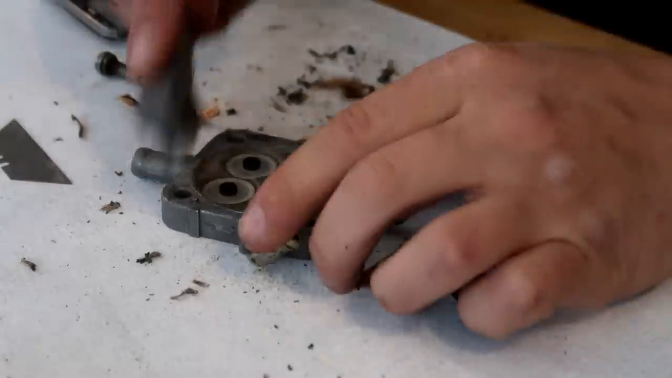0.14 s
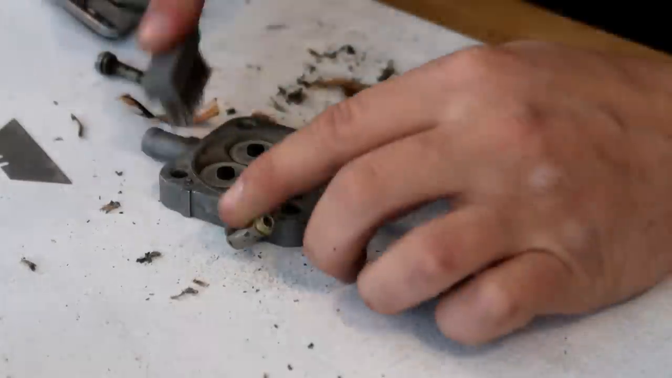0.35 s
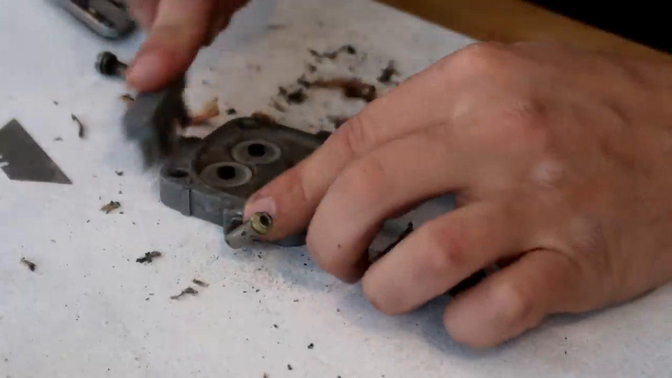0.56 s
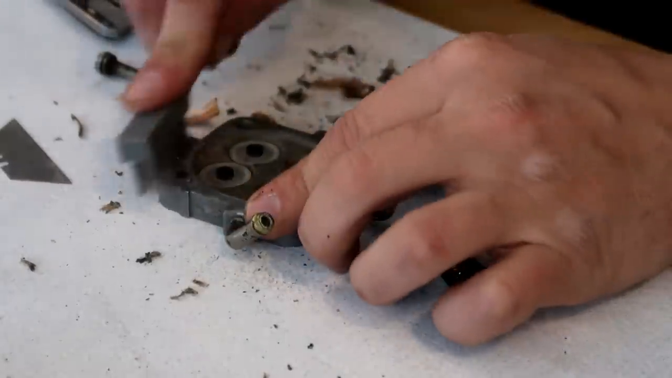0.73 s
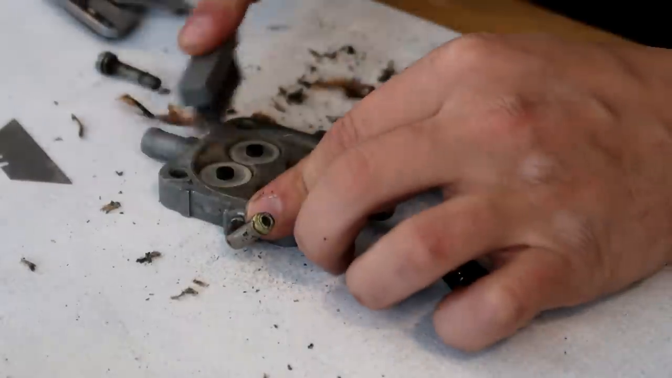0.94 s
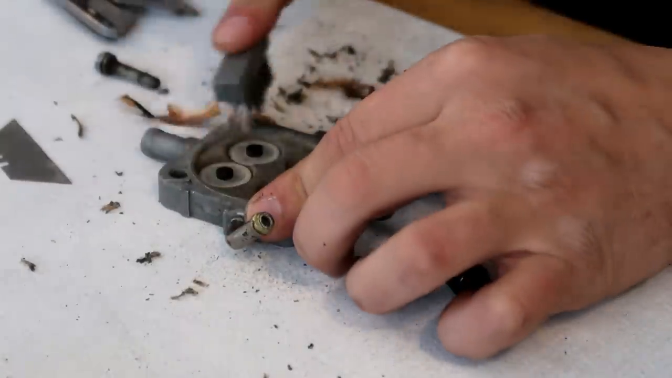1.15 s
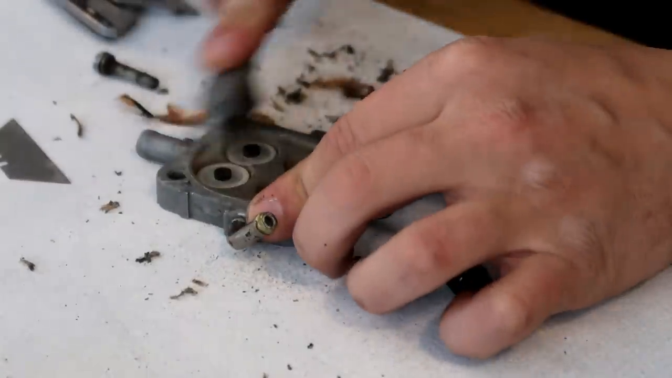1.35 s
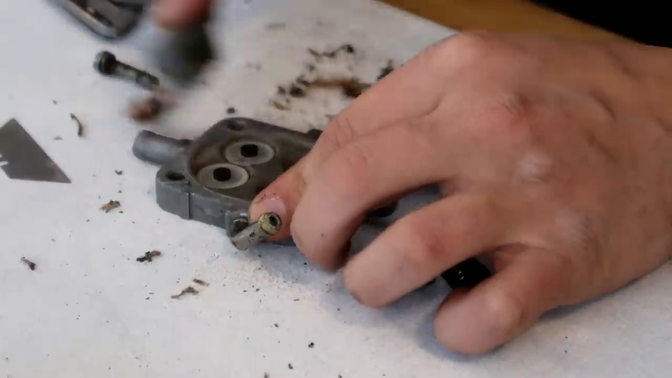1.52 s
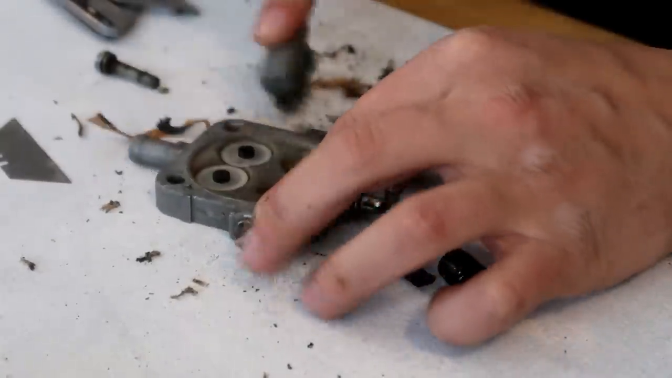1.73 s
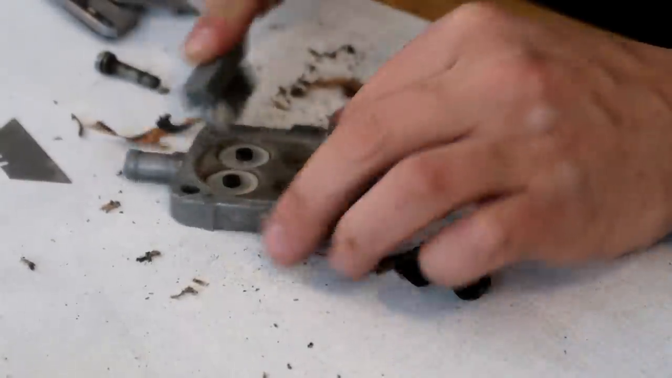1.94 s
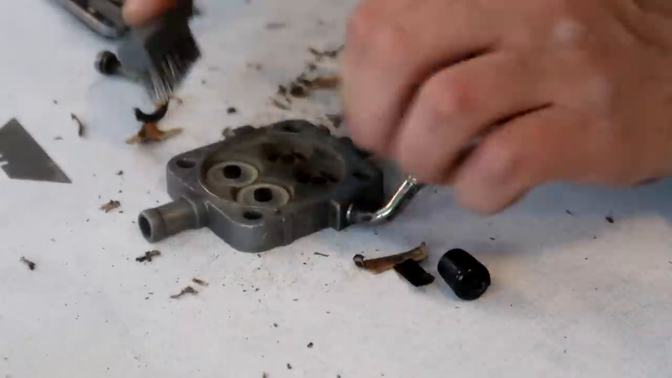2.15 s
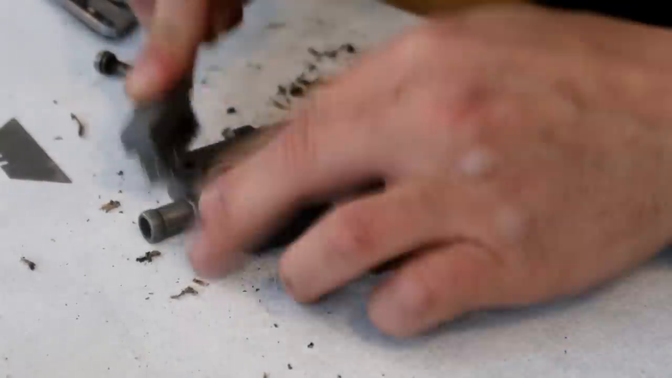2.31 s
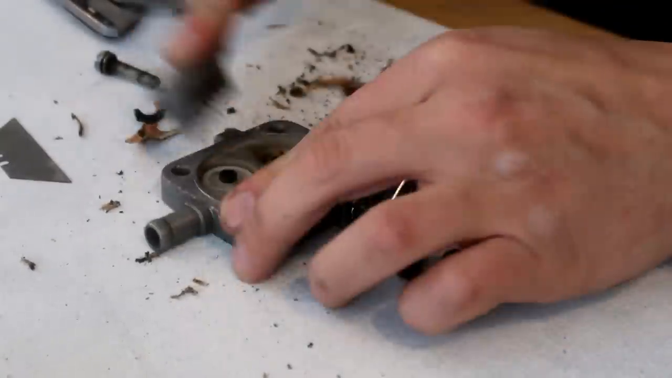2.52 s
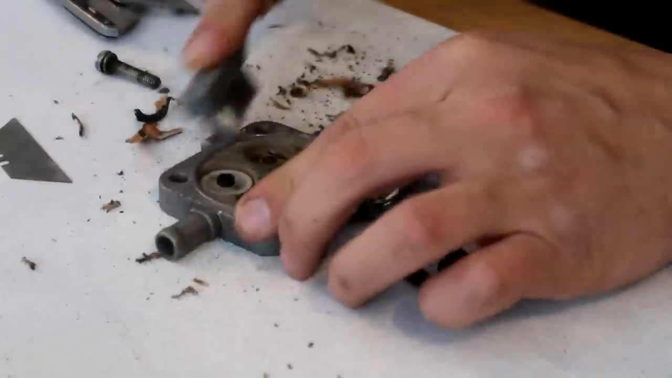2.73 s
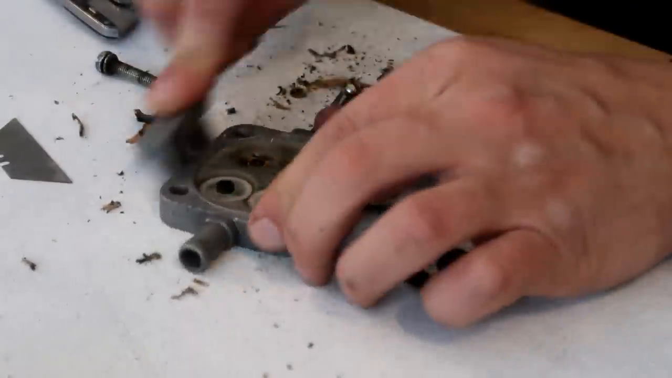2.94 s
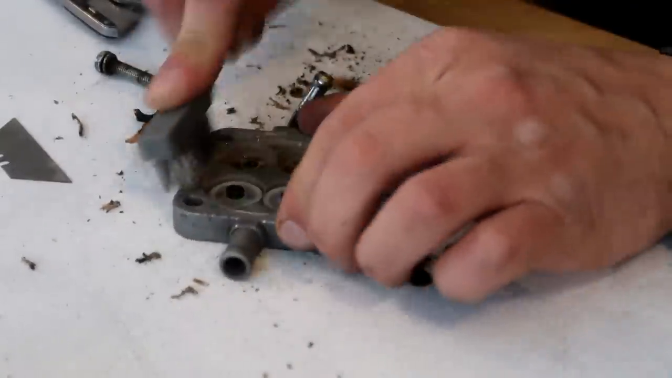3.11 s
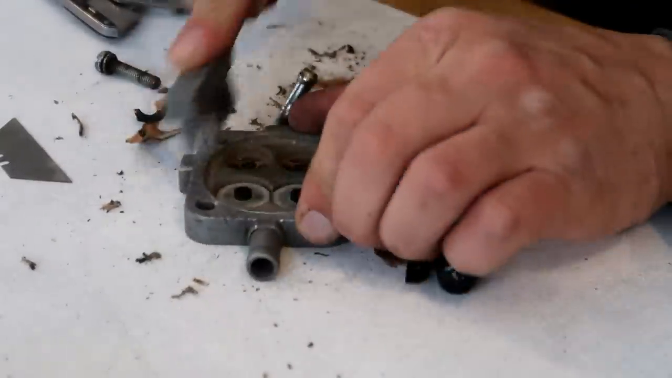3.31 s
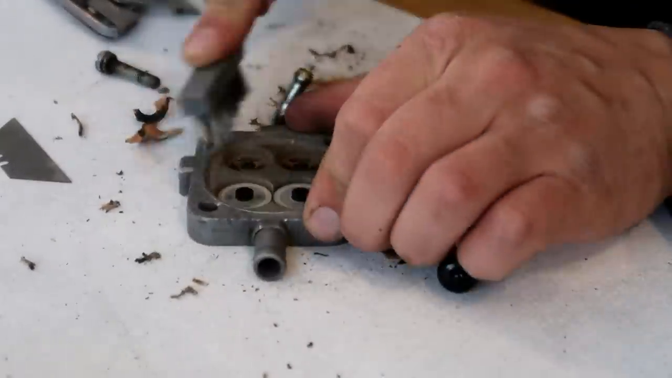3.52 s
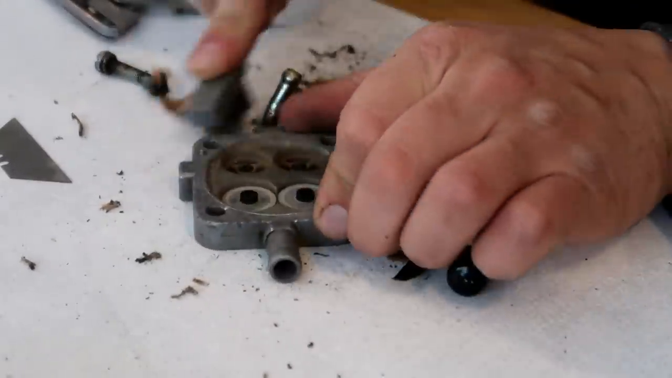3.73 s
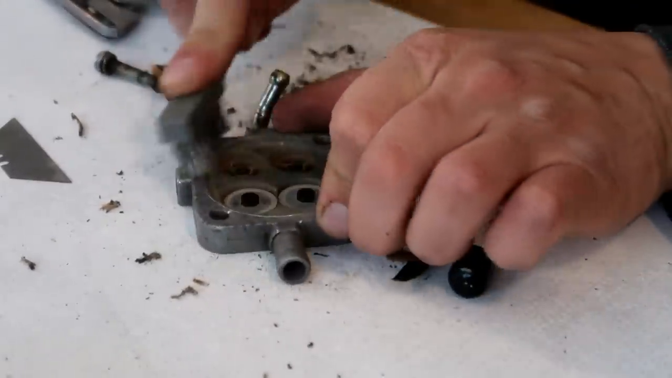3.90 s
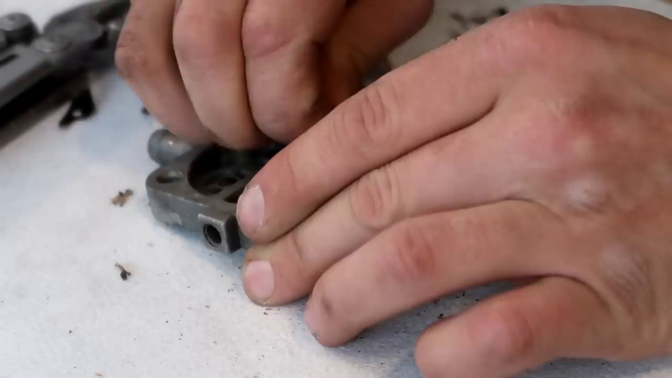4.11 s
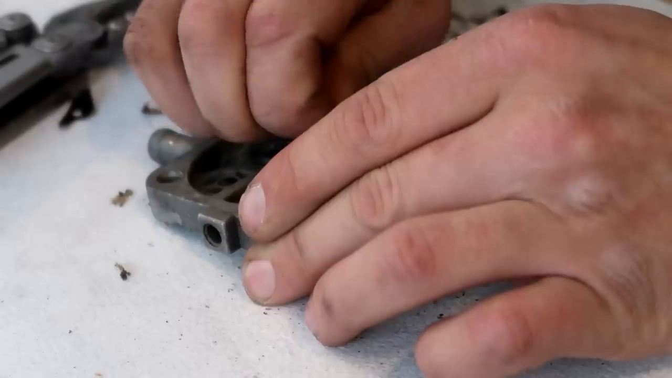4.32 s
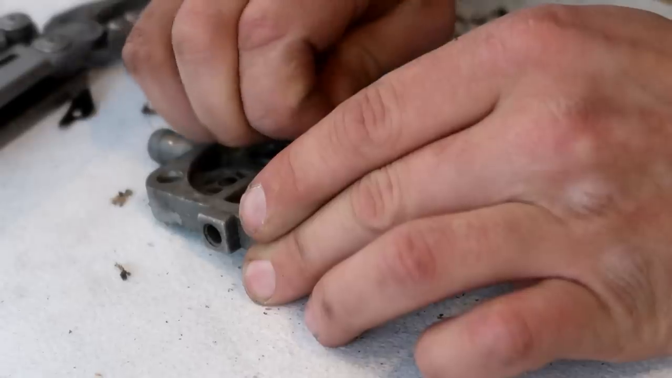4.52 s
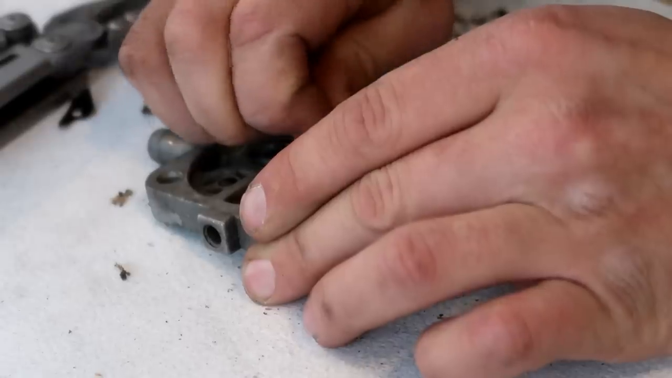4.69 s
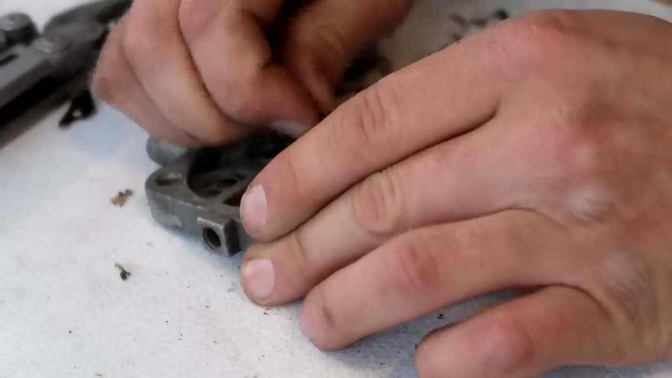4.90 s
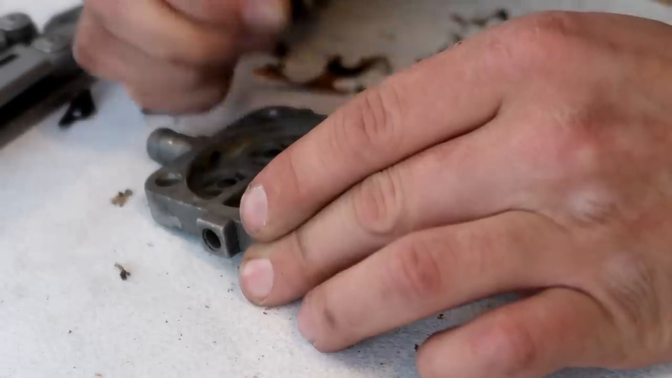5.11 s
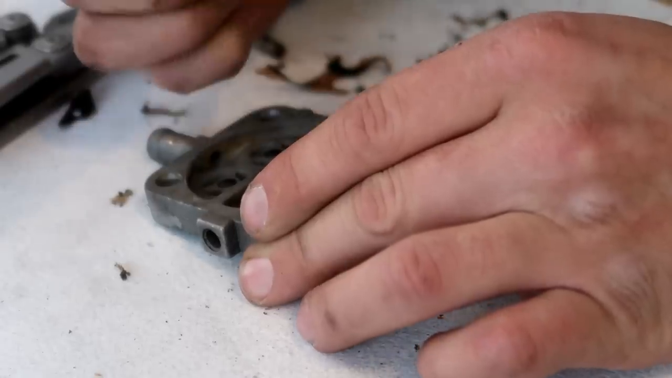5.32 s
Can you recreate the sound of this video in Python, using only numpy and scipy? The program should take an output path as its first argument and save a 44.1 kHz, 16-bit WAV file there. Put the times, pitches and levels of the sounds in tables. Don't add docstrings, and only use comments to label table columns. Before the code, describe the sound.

Close stereo camera microphone at a workbench, with a short room tail. Irregular rasping strokes about a tenth of a second long hiss over metal, with dull wooden knocks as the hand lands and slight ringing from the casting. The heavy thumps briefly push down the steady low ventilation noise. A pause for turning the part, more scraping, then quiet and light dry ticks.

```python
import sys
import numpy as np
from scipy import signal
from scipy.fft import rfft, irfft, next_fast_len
from scipy.io import wavfile
from scipy.ndimage import uniform_filter1d

SR = 44100
rng = np.random.default_rng(int(sys.argv[2]) if len(sys.argv) > 2 else 0)


def gain_from_decibels(decibels):
    exponent = np.asarray(decibels, float) / 20
    return 10 ** exponent


def digitize_waveform(pressure):
    field = np.atleast_2d(pressure).T
    bounded = np.clip(field, -1, 1)
    quanta = np.round(bounded * 32767).astype(np.int16)
    wavfile.write(sys.argv[1], SR, quanta)


N = 236191
TIME = np.arange(N) / SR
COARSE = np.arange(0, N / SR + .002, .001)
TURN_S = 2.3

# freq_hz, level_db
SHOP_AIR = [(13, -56), (22, -34), (38, -25), (64, -5.5), (151, 0), (178, -5.5), (216, -2.5), (326, -12),
            (354, -11), (766, -19), (1220, -19), (3480, -26.5), (3880, -28), (10700, -41.5), (15800, -52)]
# freq_hz, width_hz, level_db
MOTOR_HUM = [(118, 7.2, -95), (205, 4.7, -73), (812, 27, -55.5), (2094, 14, -60)]
# freq_hz, level_db
SHOP_SIDE = [(40, -22.5), (150, -13), (300, -1), (550, -0.5), (850, -2.5), (2000, -4), (16000, 1.5)]
# freq_hz, level_db
NEAR_SIDE = [(30, -46), (150, -72), (300, -42), (550, -27), (850, -29.5), (1200, -28), (2400, -36),
             (3400, -20.5), (4500, -12), (5500, -4), (7000, -4.5), (10500, 7), (12000, 1), (16000, -11)]
# freq_hz, level_db
NEAR_DIP = [(8000, 0), (9600, -2), (10300, -22), (11100, -22), (11900, 0)]
# start_s, level_db
ROCKS = [(0.0, -48), (.3, -50), (.54, -39), (.81, -41), (1.53, -25), (1.73, -38), (1.97, -37), (2.5, -34),
         (2.73, -34.5), (2.96, -28), (3.23, -35), (3.44, -38), (3.76, -35), (3.93, -35), (4.75, -51)]
# start_s, peak_db, pitch_hz, lower_ring_db, crack_db
PICKS = [
    (4.4264, -20.5, 2760, -24, -10.5),
    (4.688, -15, 2890, -2, -4),
    (4.7133, -16.5, 2500, -29, -3),
    (4.723, -21, 2780, -20, -7),
    (4.7282, -22, 2400, -11, -12),
]
# casting_ring_db, blade_ring_db, sparkle_db
TICKS = [(0.2878, -18.5, -28, -41, -17), (0.484, -30, -12, -23, -40), (0.561, -22, 0, -16, -29),
         (0.57, -28, 2, -11, -19), (0.8095, -31, 4, -6, -14), (1.4436, -24, -5, -21, -20),
         (1.515, -21, -20, -11, -8), (1.7031, -22, -0.5, -21.5, -22), (1.8048, -28, -21, -13, -25),
         (1.964, -19, -26, -23, -30), (2.4302, -24.5, 4, -15, -19.5), (2.721, -20.5, 7.5, -8, -22),
         (2.965, -30.5, 6, -16.5, -14), (3.217, -18.5, -11, -21, -22), (3.445, -27.5, -17, -9.5, -16),
         (3.708, -22.5, -24, -20, -18), (3.8864, -37, -17, -21, -6), (3.9412, -22.5, -31, -13, -17)]
# freq_hz, level_db
CHATTER = [(900, 5), (1500, -2), (3000, 3.5), (4600, -7.5), (5600, -29), (8000, -42)]
# freq_hz, level_db
SPARKLE = [(4500, -25), (6500, -2), (9000, -8), (11000, 18), (15000, -27)]
# freq_hz, width_hz, level_db
SNAP = [(4490, 650, 0)]
# freq_hz, width_hz, level_db
CLINK = [(2900, 75, 0), (2400, 120, -8)]
# freq_hz, width_hz, level_db
BLADE = [(5050, 380, 0), (6800, 400, -12)]
# start_s, thump_peak_db, push_ms, boom_re_thump_db, knock_re_thump_db
BLOWS = [(0.287, -2, 2.68, -16, -5), (0.485, -5, 1.91, -19, -13), (0.559, -14, 2.4, -15, -8.5),
         (0.807, -12, 2.23, -13, -11.5), (1.4432, -16, 1.8, -12, -26), (1.518, -27, 2.7, 1, -7),
         (1.702, -4, 1.4, -13.5, -15.5), (1.964, -4.5, 1.73, -13, -15), (2.431, -10.5, 2.7, -9, -17),
         (2.721, -5, 2.08, -13.5, -12), (2.9621, -14.5, 3.2, -14, -8), (2.9803, -14.5, 3, -11, -13),
         (3.217, -6.5, 1.8, -15.5, -16), (3.445, -9, 1.9, -15.5, -12), (3.4557, -19.5, 1.8, -18, -15),
         (3.708, -31, 1.46, -14, 7.5), (3.889, -34, 2.1, 6, -2), (3.94, -16, 1.86, -5, -15),
         (4.6865, -33, 2.54, 4, -13)]
# freq_hz, width_hz, level_db
BENCH_LOW = [(89, 60, -9.5), (105.8, 32, -9.5), (126, 6.2, -12), (149.5, 5.2, -11.5)]
BENCH_MID = [(202, 16, -4), (236, 20, -7), (273, 20, 1), (354, 24, 1), (421, 30, -6), (340, 300, 0)]
BENCH_UPPER = [(540, 30, 0), (625, 26, -1), (744, 60, -8), (942, 90, -10), (900, 700, -6)]
# start_s, length_s, rumble_db, upper_modes_re_rumble_db
SHOVES = [(0.33, 0.05, -29.5, 4), (0.54, 0.056, -29, 1.5), (.62, 0.086, -23.5, -15.5),
          (0.85, 0.12, -24, -5), (1.065, 0.025, -19.5, -8.5), (1.16, 0.099, -22, 0.5),
          (1.31, 0.073, -21, -5), (1.432, 0.067, -18.5, 5.5), (1.732, 0.038, -36, 12),
          (1.8, 0.026, -40, 5.5), (1.99, 0.14, -37.5, 5.5), (2.476, 0.061, -21, -9),
          (2.754, 0.074, -25, -4), (3.033, 0.059, -23.5, -36), (3.255, 0.049, -15, -7.5),
          (3.49, 0.042, -24.5, -1.5), (3.553, 0.052, -20, -9), (3.647, 0.094, -20, -6),
          (3.786, 0.069, -39.5, 4.5), (3.986, 0.063, -21.5, -13)]
# start_s, length_s, grit_db, casting_ring_re_grit_db, steel_fizz_re_grit_db
PUSHES = [(.305, 0.13, -35, -16, -17), (0.597, 0.14, -35, -6, -14.5), (0.814, 0.021, -32.5, -4.5, -16),
          (0.864, 0.13, -33, -3.5, -12), (1.048, 0.09, -33, -8, -18), (1.159, 0.11, -31, -6, -12),
          (1.304, 0.1, -32.5, 2, -14.5), (1.44, .085, -30, 4, -9.5), (1.723, 0.078, -34, -11, -13.5),
          (1.987, 0.067, -33.5, -14, -16), (2.096, 0.071, -49.5, -4, -38), (2.449, 0.15, -33, -6, -22),
          (2.729, 0.13, -36, -10, -14), (2.971, 0.0081, -35, 2.5, -15), (3.009, 0.099, -31.5, -9, -21),
          (3.223, .16, -34, -15, -12), (3.453, 0.019, -34.5, 2.5, -11), (3.5, 0.11, -35, -5, -9.5),
          (3.642, 0.078, -33.5, -10, -10), (3.75, 0.08, -29.5, 1, -23), (3.878, 0.015, -36, -13, -15),
          (3.943, 0.011, -33, -13, -9), (3.974, .14, -35.5, -13, -10), (4.708, 0.021, -36.5, -4.5, -24)]
# freq_hz, level_db
GRIT = [(700, -2), (1100, -16), (1600, -5.5), (2300, 1), (3100, -1), (4800, -4.5), (5800, -15), (8500, -15),
        (9800, -26.5), (11000, -28.5)]
# freq_hz, level_db
FIZZ = [(9500, -30), (10500, -12), (11800, -8), (12400, 0), (13800, 0), (15000, -7), (15600, -16),
        (16000, -60), (22000, -80)]
# freq_hz, width_hz, level_db
SCUFF = [(1510, 1300, 0)]
# freq_hz, width_hz, level_db
CASTING_FIRST = [(2410, 60, -5), (2908, 44, 0), (3870, 120, -13), (4840, 120, -12), (7740, 270, -20)]
CASTING_TURNED = [(2270, 170, 0), (2850, 110, -5), (3400, 250, -6), (4200, 300, -6), (5300, 250, -10)]


def unit(x):
    return x / np.sqrt(np.mean(x ** 2))


def colour(x, table):
    hz, db = np.transpose(table)
    size = next_fast_len(N)
    log_hz = np.log(np.arange(size // 2 + 1) * SR / size + 1)
    gain = gain_from_decibels(np.interp(log_hz, np.log(hz), db))
    return irfft(rfft(x, size) * gain, size)[:N]


def ring(x, modes):
    out = 0
    for hz, width_hz, db in modes:
        b, a = signal.iirpeak(hz, hz / width_hz, SR)
        out = out + gain_from_decibels(db) * signal.lfilter(b, a, x) / np.sqrt(width_hz)
    return out


def soft(x, hz):
    return signal.sosfilt(signal.butter(3, hz, fs=SR, output="sos"), x)


def walk(rate_hz):
    hold = int(SR / rate_hz)
    levels = np.repeat(rng.standard_normal(N // hold + 1), hold)
    return uniform_filter1d(uniform_filter1d(levels, hold), hold)[:N]


def grains(spread_db, flicker_db, rate_hz):
    noise = rng.standard_normal(N)
    size = np.minimum(rng.exponential(size=N), 6)
    return noise * gain_from_decibels(spread_db * size + flicker_db * walk(rate_hz))


def patchy(x, patch_db, rate_hz):
    edges_hz = 700 * 2 ** np.arange(0, 4.6, .5)
    out = 0
    for pair in zip(edges_hz, edges_hz[1:]):
        band = signal.sosfilt(signal.butter(2, pair, "band", fs=SR, output="sos"), x)
        out = out + gain_from_decibels(patch_db * walk(rate_hz)) * band
    return out


def swell(s, length_s, off_db_s):
    bite_db, peak_at, sag_db = -9, 0.29, -3
    end = s + length_s
    db = np.interp(COARSE, [s, s + peak_at * length_s, end, end + 1], [bite_db, 0, sag_db, sag_db - off_db_s])
    return gain_from_decibels(db) * np.clip((COARSE - s) / 0.018 + 1, 0, 1)


def duck():
    open_db, duck_db, recover_s = 1.5, 6.5, 0.21
    look_ahead_s, brace_db = .011, 25
    load = 0
    for s, db, *_ in BLOWS:
        u = np.clip(COARSE - s, 0, None) / recover_s
        load = load + gain_from_decibels(db) * u * np.exp(1 - u)
    first_s = BLOWS[0][0]
    brace = (COARSE > first_s - look_ahead_s) * (COARSE < first_s)
    return np.interp(TIME, COARSE, gain_from_decibels(open_db - duck_db * load - brace_db * brace))


def shop():
    air = gain_from_decibels(-40 + 0.36 * walk(5.78)) * unit(colour(rng.standard_normal(N), SHOP_AIR))
    hum = 0
    for hz, width_hz, db in MOTOR_HUM:
        hum = hum + gain_from_decibels(db) * unit(ring(rng.standard_normal(N), [(hz, width_hz, 0)]))
    return (air + hum) * duck()


def sway():
    rock_s, off_db_s, rest_db = 0.079, 177, -50.5
    gain = sum(gain_from_decibels(db) * swell(s, rock_s, off_db_s) for s, db in ROCKS)
    rocking = unit(ring(rng.standard_normal(N), [(37.5, 6.3, 0)]))
    return (np.interp(TIME, COARSE, gain) + gain_from_decibels(rest_db) * duck()) * rocking


def picks():
    rise_s = 0.00059
    out = np.zeros(N)
    t = np.arange(900) / SR
    for s, db, hz, low_db, crack_db in PICKS:
        click = np.sin(2 * np.pi * hz * t) * np.exp(-t / 0.0013)
        click += gain_from_decibels(low_db) * np.sin(2 * np.pi * 0.62 * hz * t) * np.exp(-t / 0.0015)
        crack = soft(np.diff(rng.standard_normal(900), prepend=0), 6900)
        click += gain_from_decibels(crack_db) * crack * np.exp(-t / 0.0023)
        i = int(s * SR)
        out[i:i + 900] += gain_from_decibels(db) * click * np.minimum(t / rise_s, 1)
    return out


def ticks():
    chatter_s, rise_s = 0.0048, 0.00032
    chatter, sparkle, clink, blade = np.zeros((4, N))
    t = np.arange(400) / SR
    shape = np.minimum(t / rise_s, 1) * np.exp(-(t / chatter_s) ** 6)
    for s, db, ring_db, blade_db, sparkle_db in TICKS:
        i = int(s * SR)
        chatter[i:i + 400] += gain_from_decibels(db) * shape
        sparkle[i:i + 400] += gain_from_decibels(db + sparkle_db) * shape
        clink[i + 40] += gain_from_decibels(db + ring_db)
        blade[i + 40] += gain_from_decibels(db + blade_db)
    noise = rng.standard_normal(N)
    out = gain_from_decibels(-3.0) * chatter * unit(colour(noise, CHATTER))
    out += gain_from_decibels(4) * sparkle * unit(colour(noise, SPARKLE))
    out += gain_from_decibels(-15.5) * chatter * unit(ring(noise, SNAP))
    out += gain_from_decibels(58.0) * soft(ring(clink, CLINK), 3300)
    return out + gain_from_decibels(57.0) * ring(blade, BLADE)


def blows():
    lag_s, snap_s = 0.003844, 0.00035
    thump, boom, knock = np.zeros((3, N))
    t = np.arange(400) / SR
    lean = 0.17 * t / lag_s * (t < lag_s) + .5 * np.exp(-((t - lag_s) / snap_s) ** 2)
    for s, db, push_ms, boom_db, knock_db in BLOWS:
        u = np.clip((t - lag_s) / (push_ms / 1000), 0, 1)
        push = (lean - np.sin(np.pi * u) ** 2) / push_ms
        i = int(s * SR)
        thump[i:i + 400] += gain_from_decibels(db) * push
        boom[i:i + 400] += gain_from_decibels(db + boom_db) * push
        knock[i:i + 400] += gain_from_decibels(db + knock_db) * push
    out = gain_from_decibels(31.5) * ring(thump, BENCH_MID) + gain_from_decibels(48.0) * ring(boom, BENCH_LOW)
    return out + gain_from_decibels(42.5) * ring(knock, BENCH_UPPER)


def strokes():
    lift_db_s, trail_db, trail_db_s = 414, -11.5, 106
    bounce_lag_s, bounce_s, bounce_off_db_s = 0.0043, 0.011, 500
    gains = np.zeros((6, len(COARSE)))
    grit, wood, fizz, metal, upper, scuff = gains
    for s, length_s, db, ring_db, fizz_db in PUSHES:
        push = swell(s, length_s, lift_db_s)
        trail = gain_from_decibels(db + trail_db) * swell(s, length_s, trail_db_s)
        rub = gain_from_decibels(db) * push + trail
        grit += rub
        upper += gain_from_decibels(-7) * rub
        scuff += gain_from_decibels(-10) * trail
        metal += gain_from_decibels(db + ring_db) * push
        fizz += gain_from_decibels(db + fizz_db) * push ** 1.5
    for s, length_s, db, upper_db in SHOVES:
        shove = swell(s, length_s, 257)
        wood += gain_from_decibels(db) * shove
        upper += gain_from_decibels(db + upper_db) * shove
    for s, db, *_ in BLOWS:
        bounce = gain_from_decibels(-14.5 + 0.8 * db) * swell(s + bounce_lag_s, bounce_s, bounce_off_db_s)
        wood += bounce
        upper += gain_from_decibels(-2) * bounce
        grit += gain_from_decibels(-31) * bounce
    return np.array([np.interp(TIME, COARSE, gain) for gain in gains])


def shaken(force, modes, patch_db, top_hz):
    out = 0
    for mode in modes:
        out = out + ring(force * grains(0.17, patch_db, 25.235), [mode])
    return soft(out, top_hz)


def rumble(gains):
    _, wood, _, _, upper, _ = gains
    low = gain_from_decibels(29.5) * shaken(wood, BENCH_LOW + BENCH_MID, 2.5, 640)
    return low + gain_from_decibels(31.0) * shaken(upper, BENCH_UPPER, 3.64, 1340)


def casting(force):
    first, turned = ring(force, CASTING_FIRST), ring(force, CASTING_TURNED)
    return soft(np.where(TIME < TURN_S, first, turned), 6000)


def rasp(gains):
    grit_gain, _, fizz_gain, metal_gain, _, scuff_gain = gains
    grit = patchy(grains(2.3, 1.8, 120), 1.5, 45)
    fizz = unit(colour(grains(0.97, 2.5, 60), FIZZ))
    metal = unit(casting(grains(2.5, 3.5, 55)))
    steel = unit(ring(grains(1.5, 3.7, 30), [(12380, 150, 0)])) * (TIME > TURN_S)
    hiss = unit(ring(grains(1.5, 3.1, 40), [(10650, 550, 5), (10600, 600, -9)])) * (TIME < TURN_S)
    out = gain_from_decibels(-3.5) * grit_gain * unit(colour(grit, GRIT))
    out += gain_from_decibels(-5.0) * fizz_gain * (fizz + steel + gain_from_decibels(10) * hiss)
    out += metal_gain * metal
    return out + scuff_gain * unit(soft(ring(grit, SCUFF), 3640))


def heard(near, t60_s=0.55, wet_db=-14):
    t = np.arange(int(.5 * SR)) / SR
    tail = rng.standard_normal(len(t)) * gain_from_decibels(-60 * t / t60_s) * (t > .004)
    tail = signal.lfilter([.4], [1, -.6], tail)
    room = signal.fftconvolve(near, tail / np.linalg.norm(tail))[:N]
    return colour(near + gain_from_decibels(wet_db) * room, NEAR_DIP)


def scene():
    gains = strokes()
    wood, thumps = rumble(gains), blows()
    mid = heard(rasp(gains) + ticks() + picks() + wood + thumps) + sway() + shop()
    apart = rasp(gains) + gain_from_decibels(-2.5) * ticks() + picks() - wood - gain_from_decibels(0.5) * thumps
    apart = heard(apart, t60_s=0.44, wet_db=-1.5)
    side = colour(apart, NEAR_SIDE) + colour(shop(), SHOP_SIDE)
    return np.array([mid + side, mid - side])


def low_pass(x):
    return signal.sosfilt(signal.butter(12, 15950, fs=SR, output="sos"), x)


def record(dry):
    rounded = dry / (1 + np.abs(dry) ** 4) ** .25
    return low_pass(rounded)


dry = scene()
out = record(dry)
digitize_waveform(out)
```